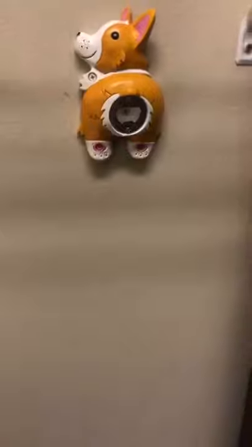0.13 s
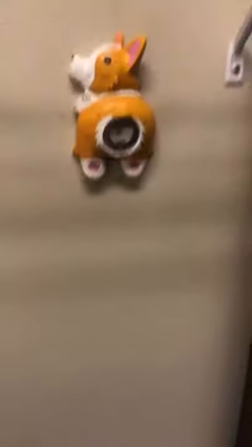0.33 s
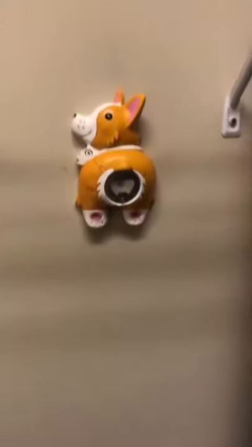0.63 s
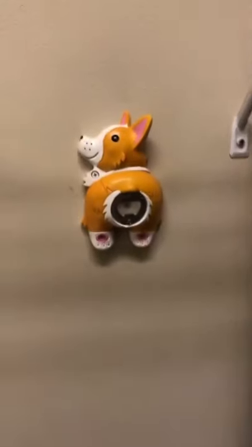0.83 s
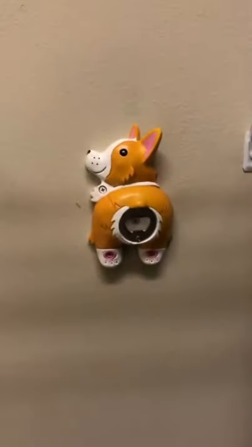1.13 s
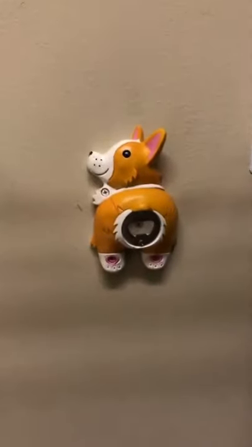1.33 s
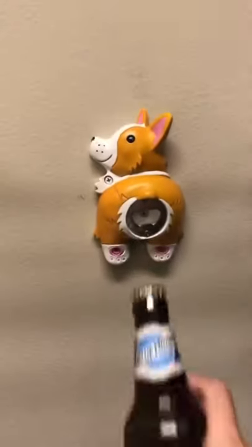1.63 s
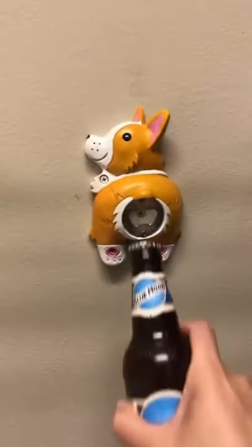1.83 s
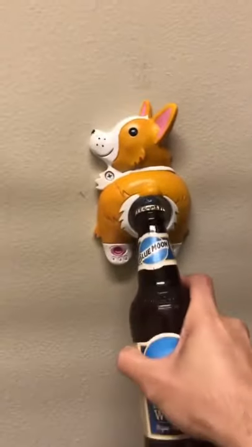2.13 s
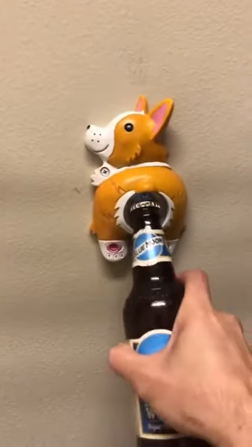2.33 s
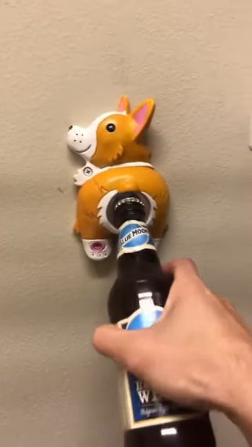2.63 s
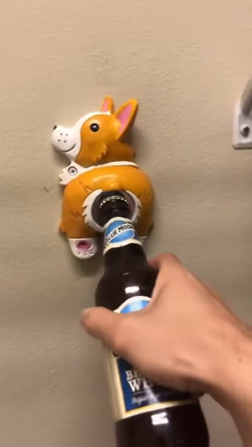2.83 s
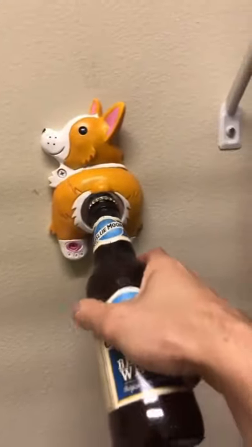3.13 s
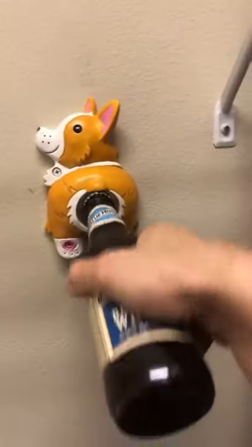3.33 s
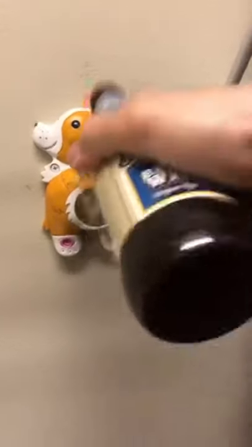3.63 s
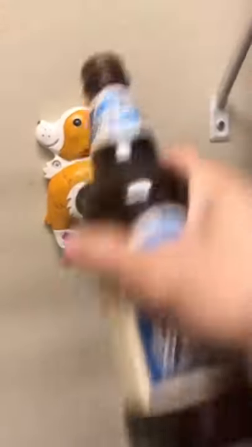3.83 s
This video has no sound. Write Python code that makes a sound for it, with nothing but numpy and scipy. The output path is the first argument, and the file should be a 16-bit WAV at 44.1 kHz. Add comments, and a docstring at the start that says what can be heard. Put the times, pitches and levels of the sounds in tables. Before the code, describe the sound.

Bottle cap popping off at a wall-mounted opener after a knock and a short gas hiss

```python
"""After a short silence, room air and a low hum, then a hand rustling as a glass bottle meets a wall opener.
The bottle knocks and shifts: pushes ring the modes of a hollow wall, and tiny contacts ring the glass.
Gas hisses past the cap as sputtering noise; the pop is noise bursts through neck resonances, with a wall thump.
The cap rattles, drops, skitters as grainy noise and bounces as short rings; bubbles glug as climbing tones.
A small hard room answers with dying noise; a phone microphone close by drops the deep bass."""
import sys
import numpy as np
from scipy import signal
from scipy.fft import rfft, irfft
from scipy.io import wavfile

SR = 44100
rng = np.random.default_rng(int(sys.argv[2]) if len(sys.argv) > 2 else 0)


def waveform_to_disk(signal):
    """Save audio, clipped to [-1, 1], as 16-bit WAV at the path in sys.argv[1]."""
    frames = np.transpose(np.atleast_2d(signal))
    scaled = np.clip(frames, -1, 1) * 32767
    samples = np.round(scaled).astype(np.int16)
    wavfile.write(sys.argv[1], SR, samples)


def volts(x):
    """Linear amplitude factor 10**(x/20) for a level x in dB, scalar or array-like."""
    e = np.asarray(x, float) / 20
    return 10 ** e


N = 176400  # length in samples

# Every *_COLOUR is a spectrum shape: pitch_hz, relative_db_per_hz. Rings use t60 of at least 0.002 s.
# pushes into the wall, each one swing in and out: start_s, strength_db, swing_ms
WALL_PUSHES = [(2.0707, -22.5, 4.06), (2.0877, -19, 1.23), (2.0893, -17.5, 1.23), (2.0919, -21, 1.26),
               (2.0944, -16.5, 3.67), (2.095, -10, 14.2), (2.109, -29, 6.9), (2.612, -29, 9.4),
               (2.664, -33, 14.8), (3.393, -33, 2.9), (3.4166, -17, 4.1), (3.4341, -5, 13.8),
               (3.918, -38.5, 2.5), (3.931, -36, 2.86), (3.984, -27.5, 2.6)]
# modes of the hollow wall: pitch_hz, level_db
WALL_MODES = [(62, -16.5), (80, -22.5), (125, -4.5), (223, -1.5), (280, 0), (350, 1.5), (480, -1), (630, 1),
              (770, -9), (953, 1), (1060, -15), (1260, -24)]
WALL_CYCLES, WALL_TOP_HZ = 12, 1300  # cycles to fall 60 dB; the soft contact drives little higher
PANEL_HZ, PANEL_DB, PANEL_T60_S = 103.8, -4.5, 0.2  # one mode of the wall hangs on

# the cap bends and lets go, air bursts from the neck: start_s, level_db, t60_s
POP_BURSTS = [(3.413, -33, 0.42), (3.425, -27.5, 0.12), (3.4328, -9.5, 0.063), (3.452, -26.5, 0.25)]
# resonances of the bottle neck: pitch_hz, width_hz, relative_level_db
NECK_RESONANCES = [(1116, 220, 3.5), (1260, 186, 2), (2380, 300, -3)]
# wide noise of the escaping air: pitch_hz, relative_db_per_hz
POP_WIDE_COLOUR = [(1500, -12.5), (2500, -3), (8000, -6.5), (9200, -16), (15500, -32)]
POP_WIDE_DB, POP_WIDE_T60_SHARE = -2, 0.31  # the wide noise has this share of the burst's t60

# glass touches the opener's lip: start_s, level_db, rattle_t60_s
GLASS_CLINKS = [(2.0675, -34, 0.066), (2.083, -37, 0.064), (2.088, -23.5, 0.055), (3.305, -42.5, 0.0067)]
# modes of the glass: pitch_hz, level_db, t60_s
GLASS_MODES = [(3690, -15, .3), (3760, -8, .03), (5421, -15, .14), (8000, -10, .008)]
# wide crack of glass on the lip: pitch_hz, relative_db_per_hz
CLINK_COLOUR = [(300, 3), (900, 0), (1600, -12), (3500, -16), (6000, -17.5), (8000, -14.5), (15500, -38)]
# the freed cap rings against the lip: start_s, level_db, rattle_t60_s
CAP_SNAPS = [(3.450, -18, 0.11), (3.456, -17, 0.052), (3.478, -23.5, 0.054), (3.49, -23, 0.13)]
# modes of the cap: pitch_hz, level_db, t60_s
CAP_MODES = [(2180, -24, 0.05), (2414, -15, 0.13), (2470, -11.5, 0.066), (2985, -10.5, 0.093),
             (4120, -9.5, 0.041), (5330, -10, .025), (6800, -18, .02), (7360, -5, 0.02), (7870, 0, 0.04)]
# wide crack of cap on the lip: pitch_hz, relative_db_per_hz
SNAP_COLOUR = [(1700, -21), (2500, 8.5), (7000, 13.5), (8600, 10), (11000, 9), (15800, -21)]
CLINK_CRACK_DB, SNAP_CRACK_DB = 7, -1.5
STRIKE_DB = 4  # strength of the first contact, over the row's level

# gas past the cap: time_s, level_db
HISS_CURVE = [(3.054, -48), (3.066, -38.5), (3.08, -26.5), (3.105, -21.5), (3.125, -28.5), (3.15, -49),
              (3.4, -66.5)]
# spectrum of the gas: pitch_hz, relative_db_per_hz
GAS_COLOUR = [(880, -25.5), (1500, -25), (2340, -3.5), (2990, -10), (6130, -4), (7680, -1.5), (8990, -8.5),
              (10300, -2), (15800, -16.5)]
SPUTTER_PER_S, SPUTTER_DB = 720, -0.5  # grains per second, scale of their random gain

# the cap lands and slides: time_s, level_db
SKITTER_CURVE = [(3.606, -47), (3.61, -27.5), (3.65, -30), (3.68, -31.5), (3.72, -44), (3.8, -56.5),
                 (4, -57)]
# spectrum of the slide: pitch_hz, relative_db_per_hz
SLIDE_COLOUR = [(880, -14.5), (1500, -18.5), (1880, -2.5), (2600, -9.5), (5610, -1), (12800, -17),
                (15800, -29)]
SKITTER_PER_S, SKITTER_GRAIN_DB = 830, 3.5  # grains per second, scale of their random gain

# small ticks and bounces, each sounding one part of what it hits: start_s, level_db, pitch_hz, ring_t60_s
BOUNCE_TICKS = [(2.6357, -37, 3900, 0.0016), (3.608, -14, 5460, 0.0077), (3.62, -21, 5760, 0.0075),
                (3.633, -42.5, 1867, 0.072), (3.788, -33, 2640, 0.015), (3.791, -30, 2985, 0.022),
                (3.9158, -27, 2150, 0.0017), (3.928, -32.5, 1790, 0.0056), (3.983, -29.5, 1120, 0.022),
                (3.982, -33.5, 3300, 0.012), (3.9825, -20.5, 6800, 0.0011)]
CHATTER_S = 0.013  # time in which the chatter falls to 1/e

# bubbles in the tilted bottle, each a climbing tone: start_s, level_db, start_pitch_hz, length_s
BUBBLES = [(2.585, -39, 253, 0.034), (2.642, -40, 334, 0.022), (3.53, -40.5, 417.5, 0.081),
           (3.79, -50, 682, 0.031), (3.853, -39.5, 852, 0.03), (3.865, -47, 496, 0.035),
           (3.885, -41.5, 830, 0.032)]
GLUG_RISE_HZ_PER_S = 1370

# the bottle rubs and bumps dully in the opener and the hand: start_s, level_db, t60_s
BOTTLE_RUBS = [(2.68, -51.5, 1), (3.27, -52, 1), (3.5, -47.5, 1), (3.915, -40.5, 1)]
# spectrum of the dull rub: pitch_hz, relative_db_per_hz
DULL_COLOUR = [(60, 2.5), (200, 12.5), (450, -1), (650, -3), (1500, -35)]
ATTACK_S = 0.0018  # onset of every dying burst

# how long the room's echoes last: pitch_hz, t60_s
ROOM_DECAY = [(60, 0.063), (110, 0.56), (300, 0.6), (1500, 0.66), (5000, 0.42), (14000, 0.3)]
ROOM_DB, WALL_ROOM_DB, ROOM_RISE_S = -7, -6.5, 0.0047  # sends of bright and dull sounds, echo build-up

# a faint rustle of hand and sleeve, in strokes: time_s, level_db
RUSTLE_CURVE = [(.3, -79.5), (1.15, -71.5), (1.34, -65), (1.39, -60), (1.54, -57.5), (1.6, -60),
                (1.64, -54), (1.79, -61), (1.82, -55.5), (1.86, -62.5), (1.89, -58.5), (1.96, -69),
                (2.01, -54.5), (2.04, -68), (2.628, -72), (2.638, -61.5), (2.7, -74), (3.05, -69),
                (3.4, -59), (4, -59)]
# spectrum of the rustle: pitch_hz, relative_db_per_hz
SLEEVE_COLOUR = [(880, -40), (1500, -7), (2830, 1), (4480, -4), (5830, -1), (12000, -13), (15500, -21.5)]
# room air: pitch_hz, relative_db_per_hz
AIR_COLOUR = [(25, -6), (64, -0.5), (86, -12), (410, -23), (1710, -28.5), (15500, -60)]
# noise in narrow rings: pitch_hz, level_db
NARROW_TONES = [(1068, -72), (1190, -72)]
AIR_DB, HUM_HZ, HUM_WIDTH_HZ, HUM_DB = -54.5, 57.9, 24.4, -60
TONES_RISE_S = 1.5  # the faint tones swell in over this time
START_S, BASS_CUT_HZ = 0.152, 44  # silence before the sound starts, microphone's low cut


def at_hz(points, hz):
    """Read a spectrum table on a log frequency axis."""
    p = np.array(points, float)
    return np.interp(np.log(np.maximum(hz, 1)), np.log(p[:, 0]), p[:, 1])


def rms_one(x):
    """Scale to rms 1."""
    return x / np.sqrt(np.mean(x ** 2) + 1e-20)


def coloured(spectrum, white=None):
    """Filter noise to the given spectrum, at rms 1."""
    white = rng.standard_normal(N) if white is None else white
    hz = np.arange(N // 2 + 1) * SR / N
    return rms_one(irfft(rfft(white) * volts(at_hz(spectrum, hz)), N))


def level(rows):
    """Gain along a curve of time_s, level_db; silent outside it."""
    s, db = np.transpose(rows)
    return volts(np.interp(np.arange(N) / SR, s, db, left=-200, right=-200))


def ring(x, hz, t60):
    """A two-pole mode: a unit click sets a dying sine of about height 1 ringing."""
    r = volts(-60 / (max(t60, .002) * SR))
    w = 2 * np.pi * hz / SR
    return signal.lfilter([0, np.sin(w)], [1, -2 * r * np.cos(w), r * r], x + 1e-18)


def resonance(x, hz, width_hz):
    """A resonant band with a gain of about 1 on top."""
    r = np.exp(-np.pi * width_hz / SR)
    poles = [1, -2 * r * np.cos(2 * np.pi * hz / SR), r * r]
    return signal.lfilter([(1 - r * r) / 2, 0, (r * r - 1) / 2], poles, x)


def dying(rows):
    """Envelope of quick starts that die away, from start_s, level_db, t60_s."""
    t = np.arange(N) / SR
    envelope = np.zeros(N)
    for s, db, t60 in rows:
        attack = np.clip((t - s) / ATTACK_S, 0, 1)
        envelope += attack * volts(db - 60 * np.maximum(t - s, 0) / max(t60, .002))
    return envelope


def grains(per_s, size_db):
    """White noise whose height jumps in short random grains."""
    step = rng.exponential(1, int(N * per_s / SR) + 2)
    grain = (np.arange(N) * per_s / SR).astype(int)
    return rng.standard_normal(N) * volts(size_db * np.minimum(step, 4))[grain]


def wall():
    """Pushes ring the hollow wall: slow swings sound the low modes, quick ones the high."""
    force = np.zeros(N + SR)
    for s, db, ms in WALL_PUSHES:
        start, n = int(s * SR), int(max(ms, .3) * SR / 1000)
        swing = np.sin(2 * np.pi * np.arange(n) / n)
        force[start:start + n] += swing * volts(db) * 2 / n
    soft = signal.sosfilt(signal.butter(2, WALL_TOP_HZ, fs=SR, output="sos"), force[:N])
    modes = sum(volts(db) * ring(soft, hz, WALL_CYCLES / hz) for hz, db in WALL_MODES)
    return modes + volts(PANEL_DB) * ring(soft, PANEL_HZ, PANEL_T60_S)


def pop():
    """Bursts of air excite the neck resonances, with some shorter wide noise."""
    air = dying(POP_BURSTS) * rng.standard_normal(N)
    neck = np.zeros(N)
    for k, (hz, width, db) in enumerate(NECK_RESONANCES):
        neck += 3.53 * volts(db) * resonance(air, hz, width) * (-1) ** k  # alternating polarity
    short = [(s, db, t60 * POP_WIDE_T60_SHARE) for s, db, t60 in POP_BURSTS]
    return neck + volts(POP_WIDE_DB) * dying(short) * coloured(POP_WIDE_COLOUR)


def rattle(rows, modes, crack, crack_db):
    """A strike, then dying bursts of tiny uneven contacts, ring the modes and give a wide crack."""
    env = dying(rows)
    contacts = rms_one(grains(700, 1.5))
    force = .07 * env * contacts
    for s, db, _ in rows:
        force[int(s * SR)] += volts(db + STRIKE_DB)
    ringing = sum(volts(db) * ring(force, hz, t60) for hz, db, t60 in modes)
    return ringing + volts(crack_db) * env * coloured(crack, contacts)


def clinks():
    """The bottle's glass modes ring as it touches the opener's lip."""
    return rattle(GLASS_CLINKS, GLASS_MODES, CLINK_COLOUR, CLINK_CRACK_DB)


def snaps():
    """The freed cap's modes ring as it strikes the lip."""
    return rattle(CAP_SNAPS, CAP_MODES, SNAP_COLOUR, SNAP_CRACK_DB)


def hiss():
    """Gas squeezing past the cap: coloured noise that sputters in random grains."""
    return level(HISS_CURVE) * coloured(GAS_COLOUR, grains(SPUTTER_PER_S, SPUTTER_DB))


def skitter():
    """The cap sliding: coloured noise in coarse random grains."""
    return level(SKITTER_CURVE) * coloured(SLIDE_COLOUR, grains(SKITTER_PER_S, SKITTER_GRAIN_DB))


def bounces():
    """Each contact is a click and a short chatter that drive one ring."""
    out = np.zeros(N + SR)
    n = int(.04 * SR)  # chatter length
    fade = np.exp(-np.arange(n) / (CHATTER_S * SR))
    chatter = rng.standard_normal((len(BOUNCE_TICKS), n)) * 0.12 * fade
    for (s, db, hz, t60), force in zip(BOUNCE_TICKS, chatter):
        start = int(s * SR)
        hit = np.r_[1, force, np.zeros(SR // 2 - n - 1)]
        out[start:start + SR // 2] += volts(db) * ring(hit, hz, t60)
    return out[:N]


def glugs():
    """Each bubble is a sine that swells quickly, fades and rises in pitch."""
    out = np.zeros(N + SR)
    for s, db, hz, length in BUBBLES:
        start = int(s * SR)
        t = np.arange(int(length * SR)) / SR
        shape = np.sin(np.pi * np.sqrt(t / length))
        tone = np.sin(2 * np.pi * (hz + GLUG_RISE_HZ_PER_S * t / 2) * t)
        out[start:start + len(t)] += volts(db) * shape * tone
    return out[:N]


def rubs():
    """Dull friction and bumps: slow-grained low noise that dies away."""
    return dying(BOTTLE_RUBS) * coloured(DULL_COLOUR, grains(60, 1.4))


def room(x):
    """Dense echoes of a small hard room: noise that dies band by band."""
    t = np.arange(int(.8 * SR)) / SR
    edges = 40 * 2 ** np.arange(0, 9, .5)  # half-octave bands
    tail = np.zeros(len(t))
    for lo, hi in zip(edges, edges[1:]):
        band = signal.butter(2, [lo, hi], "band", fs=SR, output="sos")
        decay = volts(-60 * t / at_hz(ROOM_DECAY, np.sqrt(lo * hi)))
        tail += signal.sosfilt(band, rng.standard_normal(len(t))) * decay
    tail *= np.clip(t / ROOM_RISE_S, 0, 1) ** 2
    return signal.fftconvolve(x, tail / np.sqrt(np.sum(tail ** 2)))[:N]


def rustle():
    """Hand and sleeve: coloured noise shaped in strokes."""
    return level(RUSTLE_CURVE) * coloured(SLEEVE_COLOUR)


def hum(white):
    """A wavering hum: noise passed twice through one low resonance."""
    once = resonance(white, HUM_HZ, HUM_WIDTH_HZ)
    return volts(HUM_DB) * rms_one(resonance(once, HUM_HZ, HUM_WIDTH_HZ))


def faint_tones(white):
    """Noise through narrow resonances, swelling in at the start."""
    tones = sum(volts(db) * rms_one(resonance(white, hz, 5.4)) for hz, db in NARROW_TONES)
    return tones * np.clip(np.arange(N) / SR / TONES_RISE_S, 0, 1) ** 2


def background():
    """Room air as steady coloured noise, with the hum and the faint tones."""
    white = rng.standard_normal(N)
    return volts(AIR_DB) * coloured(AIR_COLOUR) + hum(white) + faint_tones(white)


def scene():
    """Mix all sources, near and with the room."""
    dull = wall() + glugs() + rubs()
    bright = pop() + clinks() + snaps() + hiss() + skitter() + bounces()
    echoes = room(volts(WALL_ROOM_DB) * dull + volts(ROOM_DB) * bright)
    return (dull + bright + echoes + rustle() + background())[None]


def band_limit(x):
    """A steep low-pass at the top of the band."""
    return signal.sosfilt(signal.butter(12, 15910, fs=SR, output="sos"), x)


def record(dry):
    """The microphone drops the deep bass; the sound starts after a short silence."""
    low_cut = signal.butter(3, BASS_CUT_HZ, "high", fs=SR, output="sos")
    heard = signal.sosfilt(low_cut, dry)
    started = np.arange(N) >= START_S * SR
    return band_limit(heard * started)


dry = scene()
out = record(dry)
waveform_to_disk(out)
```